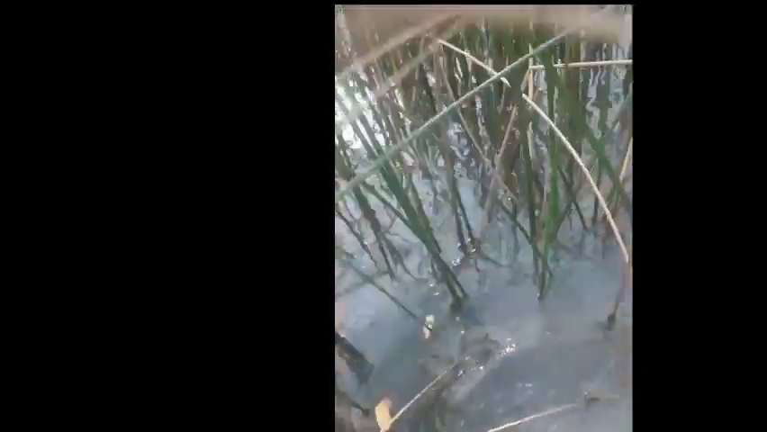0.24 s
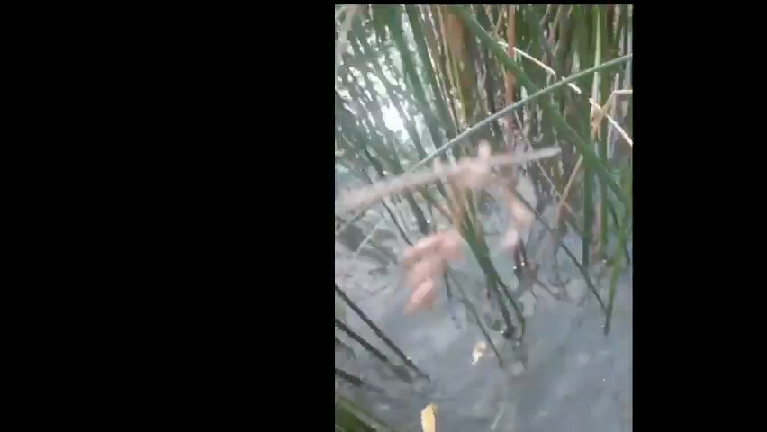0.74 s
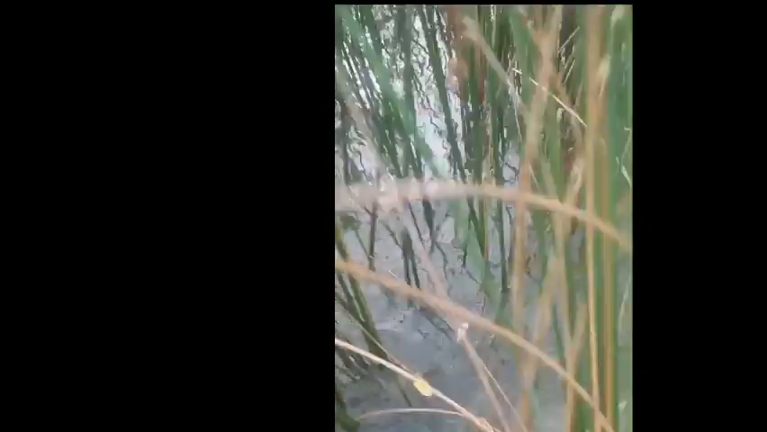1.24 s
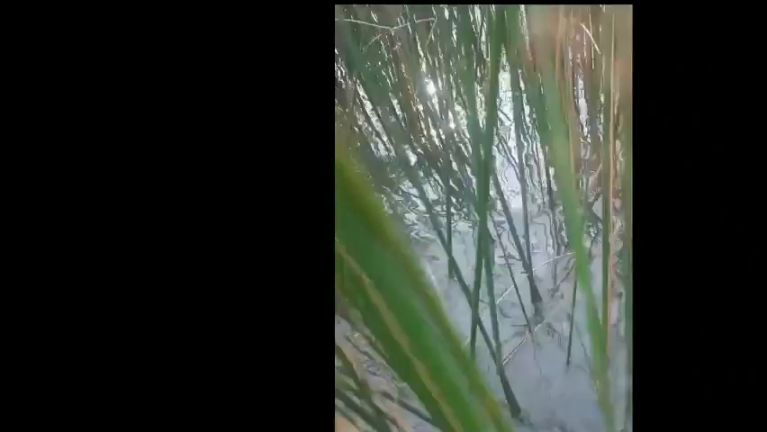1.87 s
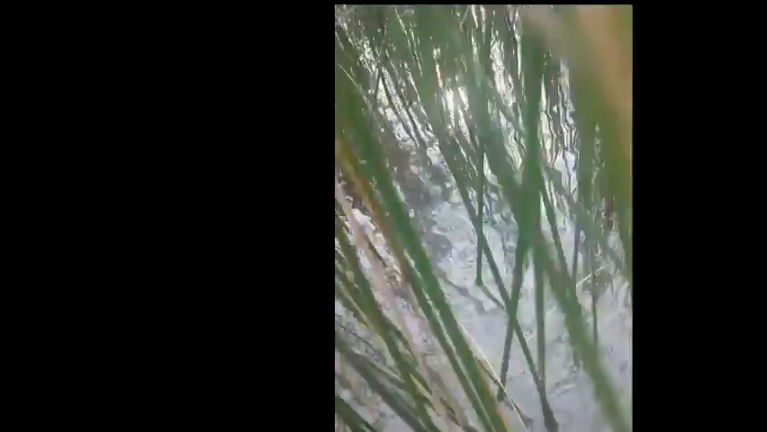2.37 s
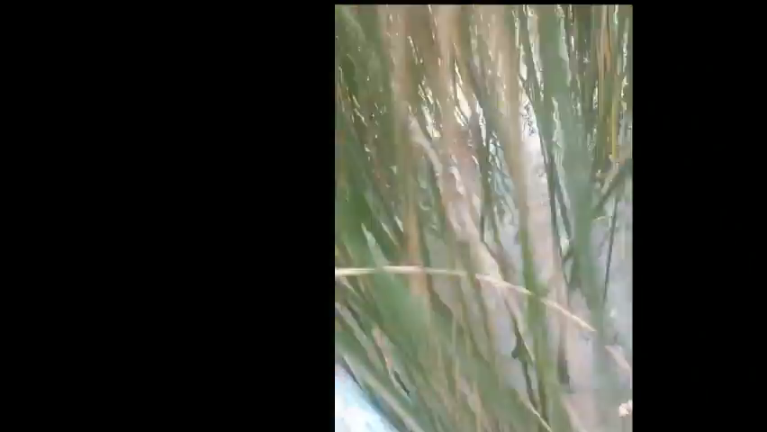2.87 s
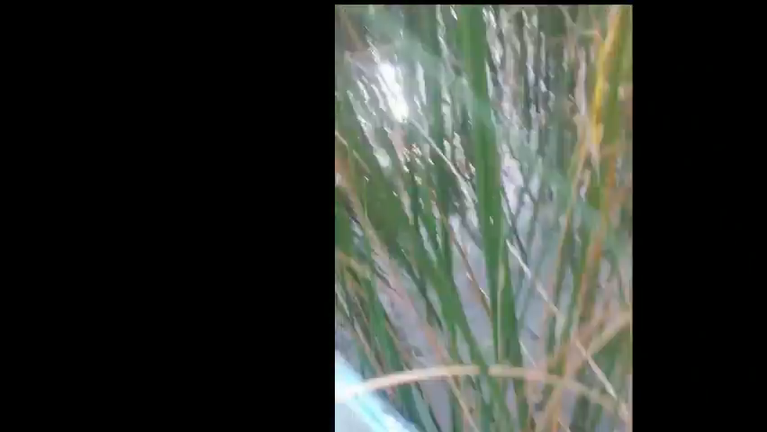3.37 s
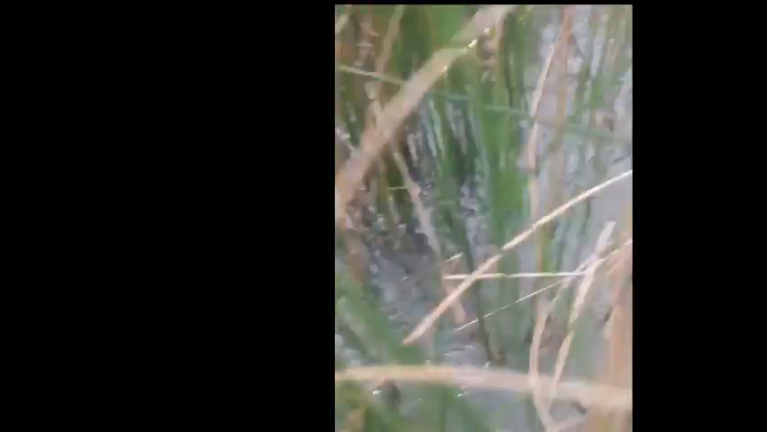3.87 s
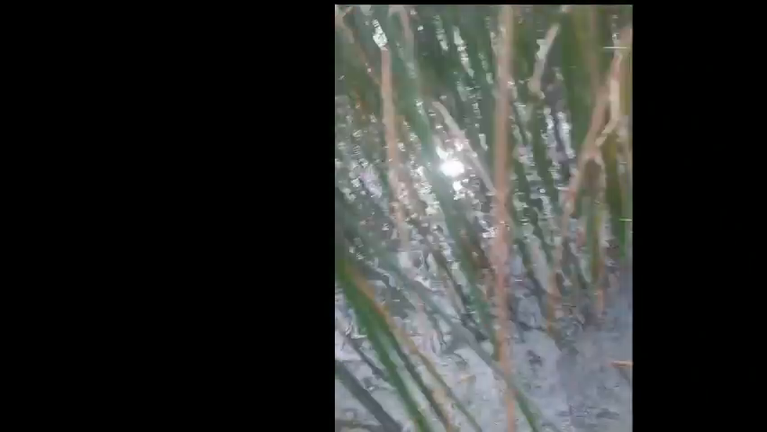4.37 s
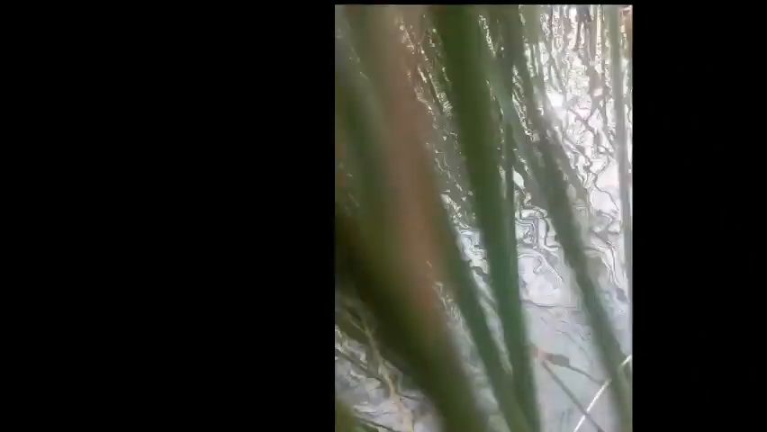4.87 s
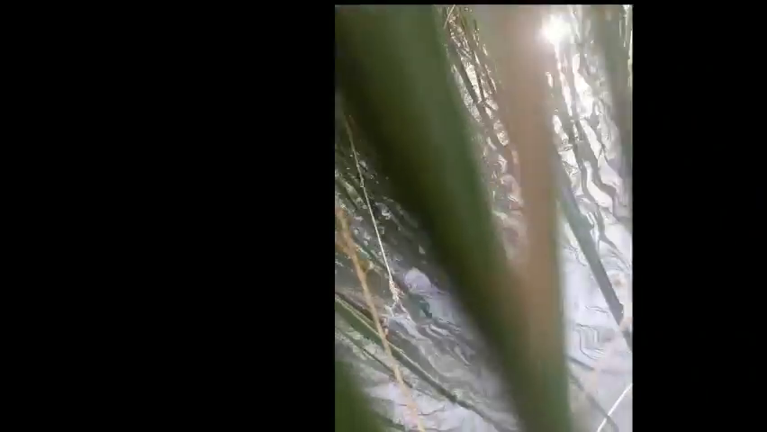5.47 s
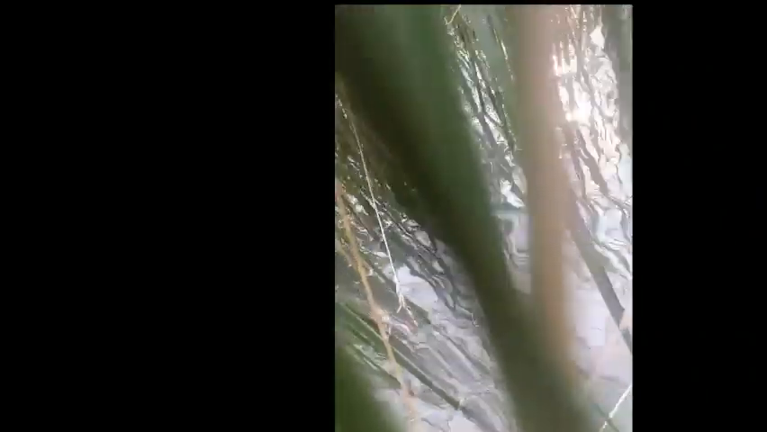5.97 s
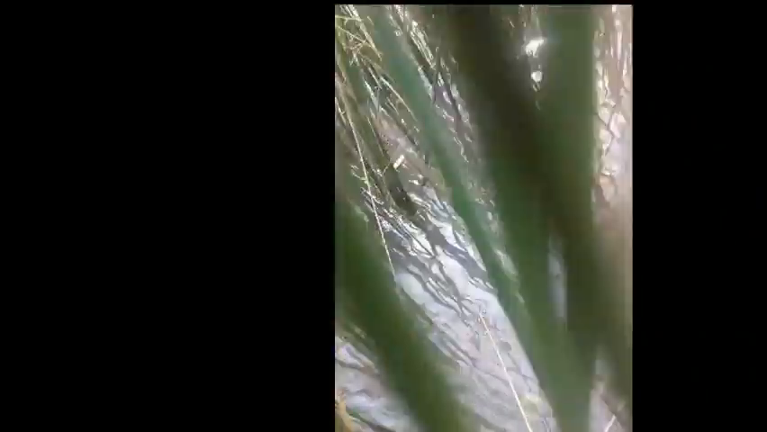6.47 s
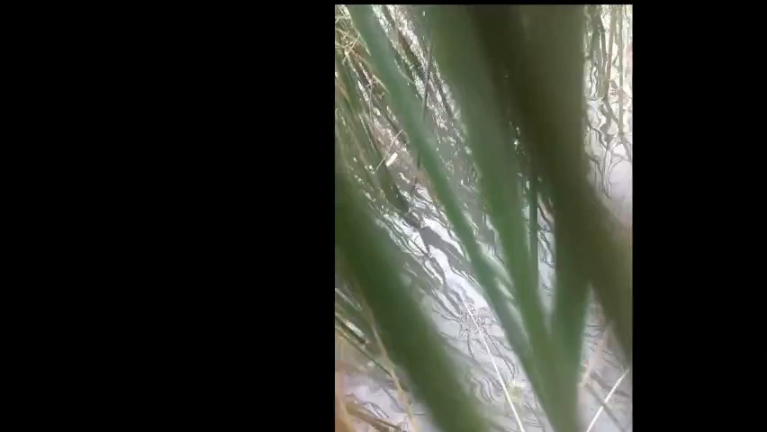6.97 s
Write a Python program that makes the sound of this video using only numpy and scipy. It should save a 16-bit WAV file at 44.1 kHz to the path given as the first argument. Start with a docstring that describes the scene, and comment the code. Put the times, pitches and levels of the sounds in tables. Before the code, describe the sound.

Dry, bright reed leaves rustle and scrape right against a phone microphone as it pushes through a bed in shallow water. Stiff stems snap and flick in two loud flurries during the first half. Then hollow knocks and rubbing of stems on a hull take over, while the rustle thins out. Faint gurgles and drips sit underneath, along with a soft low rumble and hiss.

```python
"""Dense reeds rustle and scrape as someone pushes a phone through them over shallow water.
The leaves are swarms of tiny scratches; stiff stems snap and flick close to the microphone.
Stems rub and knock a hollow hull, ringing its modes, and the water gurgles and drips in short
bubbles. A low rumble and a faint hiss lie under it all."""
import sys
import numpy as np
from scipy import signal
from scipy.fft import rfft, irfft, next_fast_len
from scipy.io import wavfile
from scipy.ndimage import uniform_filter1d

SR = 44100
rng = np.random.default_rng(int(sys.argv[2]) if len(sys.argv) > 2 else 0)


def dump_mix(stems):
    """Bounce the given channels to the path in sys.argv[1] as a 16-bit WAV at rate SR."""
    frames = np.atleast_2d(stems).T  # one column per channel
    limited = np.clip(frames, -1, 1)  # hard clip at full scale
    pcm = np.round(limited * 32767).astype(np.int16)
    wavfile.write(sys.argv[1], SR, pcm)


N = 318843

# Resonances of the hollow hull. Each row: frequency in Hz, relative level in dB,
# base time in seconds to die away by 60 dB (t60).
HULL_MODES = [(227.2, 4.5, 0.21), (280, -5.5, 0.3), (359, 2, 0.078), (443.4, -0.5, 0.077),
              (524, 0.5, 0.052), (570, -36, 0.2), (645, 3.5, 0.053), (728.6, -4, 0.083), (883, 5.5, 0.054),
              (997, 1.5, 0.033), (1113, 3, 0.017), (1310, 16, 0.014), (1532, 5.5, 0.057), (1735, -32, 0.1),
              (1757, 3, 0.09), (2360, 0, 0.031), (2737, 8, 0.058), (3560, -8.5, 0.033)]


def undb(db):
    """Decibels to gain."""
    return 10 ** (np.asarray(db) / 20)


def unit(x):
    """Scale to rms 1."""
    return x / np.sqrt(np.mean(x ** 2))


def at_peak(x, db=0):
    """Scale to a peak level in dB."""
    return x * undb(db) / np.abs(x).max()


def decay(t, t60):
    """Exponential fade, 60 dB down after t60 seconds."""
    return np.exp(-np.log(1000) * t / t60)


def colour(x, points):
    """EQ drawn through (Hz, dB) points; falls away outside them."""
    hz, db = np.transpose(points)
    size = next_fast_len(len(x))
    log_f = np.log(np.maximum(np.arange(size // 2 + 1) * SR / size, 1))
    outside = np.maximum(np.log(hz[0]) - log_f, 0) + np.maximum(log_f - np.log(hz[-1]), 0)
    gain_db = np.interp(log_f, np.log(hz), db) - 20 * outside
    return irfft(rfft(x, size) * undb(gain_db), size)[:len(x)]


def band(x, lo_hz, hi_hz):
    """Causal band-pass."""
    sos = signal.butter(2, [lo_hz, min(hi_hz, .45 * SR)], "band", fs=SR, output="sos")
    return signal.sosfilt(sos, x)


def wander(rate):
    """Random levels held 1 / rate seconds and smoothed twice; rms 1."""
    hold = int(SR / rate)
    steps = np.repeat(rng.standard_normal(N // hold + 1), hold)
    return unit(uniform_filter1d(uniform_filter1d(steps, hold), hold)[:N])


def follow(table):
    """Draw one curve per column through the times in the first column."""
    times, *columns = np.transpose(table)
    return [np.interp(np.arange(N) / SR, times, column) for column in columns]


def add(out, start_s, x):
    """Mix x into out at a time."""
    i = int(start_s * SR)
    out[i:i + len(x)] += x[:len(out) - i]


def friction(rate, spread_db, t60, bed_db):
    """A bed of countless faint contacts, topped by `rate` sudden, uneven scratches a second."""
    starts = (rng.random(N) < rate / SR) * undb(spread_db * np.minimum(rng.exponential(size=N), 3))
    swarm = signal.lfilter([1], [1, -decay(1 / SR, t60)], starts)
    return (undb(bed_db) + unit(swarm)) * rng.standard_normal(N)


def leaf_rustle():
    """Leaves brush past in a swarm of tiny, bright scratches."""
    # Tone of the leaves. Each row: frequency in Hz, gain in dB.
    leaf_eq = [(4500, -1.5), (6000, -1.5), (8000, 1.5), (11000, 2.5), (15000, 9)]
    return unit(colour(friction(rate=110, spread_db=6, t60=0.019, bed_db=3), leaf_eq))


def leaf_ticks():
    """Sparse, very short leaf contacts make dry ticks."""
    # Tone of the ticks. Each row: frequency in Hz, gain in dB.
    tick_eq = [(3500, -9), (6000, -7.5), (10000, -4), (15000, 4.5)]
    return unit(colour(friction(rate=25, spread_db=6, t60=0.0049, bed_db=-30), tick_eq))


def stem_scrape():
    """Stems scrape by with a denser, lower grain than the leaves."""
    # Tone of the scrape. Each row: frequency in Hz, gain in dB.
    scrape_eq = [(1000, -11), (1700, 3.5), (2500, 2), (3500, 6.5), (5000, -7), (7000, -49)]
    return unit(colour(friction(rate=190, spread_db=7.5, t60=0.012, bed_db=4.5), scrape_eq))


def bubbles(count, centre_hz, octaves, cycles=14, glide=0.08, spread_db=3):
    """Air pockets closing in the stirred water: short sines that rise as they fade."""
    out = np.zeros(N)
    for when, pitch, size in zip(rng.random(count), rng.standard_normal(count),
                                 rng.exponential(size=count)):
        hz = centre_hz * 2 ** np.clip(octaves * pitch, -1.5, 2.2)
        turns = np.arange(int(2 * cycles * SR / hz)) * hz / SR
        fade = np.exp(-3 * turns / cycles) * np.minimum(turns / 2, 1)
        chirp = np.sin(2 * np.pi * turns * (1 + glide * turns / cycles / 2))
        add(out, when * N / SR, undb(spread_db * min(size, 2.5)) * fade * chirp)
    return unit(out)


def hull_rub(centre_hz):
    """Stems drag along the hull in slips, exciting mostly the modes near centre_hz."""
    slips = friction(rate=70, spread_db=5.8, t60=0.087, bed_db=-4)
    out = 0
    for hz, db, t60 in HULL_MODES:
        pole = decay(1 / SR, 0.59 * t60)
        mode = signal.lfilter([1, 0, -1], [1, -2 * pole * np.cos(2 * np.pi * hz / SR), pole ** 2], slips)
        nearness = (1 + (np.log(hz / centre_hz) / 0.46) ** 2) ** -1.65
        out = out + unit(mode) * undb(db + 2.4 * wander(13)) * nearness
    return unit(out)


def air():
    """A steady bed of low noise and thin hiss, with a far rumble that wavers."""
    # Tone of the bed. Each row: frequency in Hz, gain in dB.
    air_eq = [(15, -42), (30, -20), (96, 6), (246, -8.5), (523, -15), (1400, -19), (2300, -85),
              (5000, -91.5), (7500, -28), (10600, -58), (15500, -26.5)]
    bed = unit(colour(rng.standard_normal(N), air_eq))
    waver = undb(1.3 * wander(13) + 1.3 * wander(0.4))
    rumble = waver * unit(band(rng.standard_normal(N), 65, 127.5))
    return undb(-50) * bed + undb(-61.5) * rumble


def stem_flicks(snap_db=2, snap_s=0.0012):
    """A stem lets go: a snapping, chattering crack, a duller body and a push of air on the diaphragm."""
    # Close flicks. Each row: start in seconds, crack peak in dB, body peak in dB before a 5 dB lift.
    flicks = [(0.3566, -24, -46), (0.533, -23, -46.5), (0.669, -25, -39.5), (0.683, -20, -42),
              (0.762, -19, -42), (0.841, -4, -21.5), (1.003, -21, -47), (1.0821, -5.5, -23),
              (1.1722, -7.5, -17.5), (1.2518, -13, -26), (1.2967, -14, -34), (1.3099, -1.5, -13.5),
              (1.3348, -8, -27), (1.4488, -6, -19.5), (1.47, -4.5, -29), (2.391, -16, -26.5),
              (2.5265, -25, -35.5), (2.6893, -10, -21.5), (2.7124, -17.5, -26), (2.8639, -8, -10.5),
              (2.8697, -0.5, -7), (2.886, -9, -9), (2.9076, -11, -18), (2.9122, -10, -20.5),
              (2.931, -15, -16), (2.9503, -1.5, -17), (2.9568, -7, -10.5), (2.9826, -12, -9),
              (2.9939, -3, -12.5), (3.0658, -12.5, -20.5), (3.2881, -14.5, -29.5), (3.4412, -27.5, -37),
              (3.531, -21.5, -36), (3.5485, -25, -36), (3.5963, -20, -27.5), (3.662, -25, -22),
              (3.678, -21.5, -45), (3.8276, -26, -30), (4.0691, -44, -25.5), (4.0907, -49, -26.5),
              (4.176, -28, -12), (4.1902, -22, -19.5), (4.4009, -13.5, -23.5), (4.504, -46, -34),
              (5.029, -51, -39), (5.055, -49, -36), (5.139, -39, -32.5), (5.3924, -26.5, -39),
              (5.6863, -34, -47), (6.232, -40, -44.5), (6.306, -54, -53), (7.1629, -31.5, -43)]
    out, t = np.zeros(N), np.arange(2500) / SR
    snap = 1 + undb(snap_db) * np.exp(-t / snap_s)
    fade = decay(t, t60=0.033)
    air_push = t * np.exp(-t / 0.00083) - 0.037 * t * np.exp(-t / 0.0031)  # diaphragm swings out and back
    for start_s, crack_db, body_db in flicks:
        crack_noise, body_noise, thump_noise, jitter = rng.standard_normal((4, len(t)))
        flutter = uniform_filter1d(jitter, size=49) * np.sqrt(49)
        chatter = snap * undb(8 * np.minimum(t / 0.011, 1) * flutter)
        crack = band(np.diff(crack_noise, prepend=0) * fade * chatter, 4300, 20800)
        body = band(body_noise * fade ** 1.12 * chatter, 535, 4130)
        thump = band(thump_noise * fade ** 2.55, 28, 830)
        thump_db = min(crack_db, body_db) + 2.5  # only near flicks, both bright and full, push much air
        push = np.sign(thump_noise[0]) * air_push
        for part, db in ((crack, crack_db), (body, body_db + 5), (thump, thump_db), (push, thump_db - 9)):
            add(out, start_s, at_peak(part, db))
    return out


def leaf_wipes(attack_s=0.0071, release_s=0.03):
    """Extra rustle gain as leaves wipe right across the phone: quick rise, hold, exponential release."""
    # Each row: start in seconds, hold in seconds, relative level in dB.
    wipes = [(1.084, 0.28, -27), (2.842, 0.17, -24.5)]
    gain, t = np.zeros(N), np.arange(N) / SR
    for start_s, hold_s, db in wipes:
        attack = np.clip((t - start_s) / attack_s, 0, 1)
        release = np.exp(-np.maximum(t - start_s - hold_s, 0) / release_s)
        gain += undb(db) * attack * release
    return gain


def hull_knocks(reach=0.22, skirt_reach=0.67, skirt_db=-20.5, scatter_db=4, rattle_db=-11.5):
    """Each blow slaps the hull and rings a new mix of modes near its centre; loose stems rattle after."""
    # Blows on the hull. Each row: start in seconds, peak in dB before the slap is added,
    # centre pitch in Hz, ring length as a multiple of the modes' t60.
    blows = [(1.353, -19, 1240, 0.95), (1.373, -24.5, 400, 0.5), (1.703, -30.5, 970, 0.98),
             (1.805, -26, 296, 0.75), (1.896, -24, 1920, 0.16), (2.509, -27.5, 785, 1.4),
             (2.994, -17, 810, 2), (3.126, -25, 312, 0.79), (3.2, -23, 380, 0.65),
             (3.302, -27.5, 850, 0.52), (3.652, -25.5, 1340, 0.41), (3.662, -18.5, 1010, 0.43),
             (3.692, -27.5, 399, 2), (3.749, -25.5, 1600, 0.45), (3.889, -30.5, 397, 2.2),
             (3.963, -32, 1800, 0.21), (4.068, -27, 600, 1.8), (4.13, -22.5, 780, 0.34),
             (4.173, -7.5, 503, 1.7), (4.178, -5, 1200, 0.72), (4.192, -4.5, 520, 0.91),
             (4.424, -19.5, 1520, 0.46), (4.438, -18.5, 508, 0.95), (4.546, -21.5, 524, 0.62),
             (5.176, -28, 500, 1.5), (5.401, -29, 625, 1.2), (5.451, -21, 530, 0.66),
             (5.473, -10, 1380, 0.3), (5.965, -48.5, 3270, 1.5), (6.145, -9, 674, 0.62),
             (6.194, -33, 1520, 0.48), (6.205, -15, 536, 1.03), (6.307, -28, 1040, 0.2),
             (6.418, -33, 730, 0.97), (6.492, -35, 697, 1.1), (6.676, -41.5, 1230, 0.34),
             (6.858, -29, 890, 0.9), (6.874, -5, 640, 1.13), (6.879, -17.5, 244, 1.53),
             (6.905, -18, 498, 2.7), (7.151, -32, 680, 1.3)]
    out, t = np.zeros(N), np.arange(9000) / SR
    hz, db, t60 = np.transpose(HULL_MODES)
    variations = rng.standard_normal((len(blows), 3, len(hz)))
    for (start_s, peak_db, centre_hz, length), (scatter, detune, phase) in zip(blows, variations):
        noise = rng.standard_normal(len(t))
        distance = np.log(hz / centre_hz)
        near = np.exp(-.5 * (distance / reach) ** 2)
        skirt = undb(skirt_db) * np.exp(-.5 * (distance / skirt_reach) ** 2)  # far modes stir faintly
        gains = undb(db + scatter_db * scatter) * (near + skirt)
        angles = 2 * np.pi * np.outer(hz * (1 + 0.034 * detune), t) + 1.05 * phase[:, None]
        ring = gains @ (np.sin(angles) * decay(t, length * t60[:, None]))
        rattle = band(noise, 0.742 * centre_hz, 1.014 * centre_hz)
        rattle = unit(band(rattle, 58, 3.2 * centre_hz)) * decay(t, 0.11 * length)
        rise = (1 - np.exp(-t * centre_hz * 4)) ** 2  # a softer, lower blow takes longer to land
        blow = rise * (at_peak(ring) + undb(rattle_db) * rattle)
        contact = noise[::-1] * np.minimum(t / 0.00071, 1) * decay(t, t60=0.023)
        slap = band(band(contact, 990, 3030), 990, 3030)
        slap_db = min(13 - 24.5 * length + 0.94 * peak_db, -7)  # hard, dry blows slap most
        add(out, start_s, undb(peak_db) * (at_peak(blow) + at_peak(slap, slap_db)))
    return out


def scene():
    """The push through the reeds rides the textures; flicks, knocks and air join them in mono."""
    # Faders for the reeds. Each row: time in seconds, leaf fader in dB, stem and drip fader in dB.
    push = [(0, -45, -55), (0.5, -40.5, -52), (0.63, -50, -60), (0.67, -39, -49.5), (1.47, -33, -42),
            (1.52, -42, -51), (1.66, -34.5, -46), (2.25, -46.5, -53.5), (2.34, -36.5, -46),
            (2.84, -36.5, -45.5), (3.11, -31.5, -39), (3.3, -34.5, -43.5), (3.5, -46, -55),
            (3.68, -43, -45.5), (4.3, -50.5, -73), (4.68, -41, -42.5), (5.04, -49, -54.5),
            (5.14, -37.5, -43), (5.44, -49.5, -60), (6.05, -60.5, -75.5), (6.35, -58, -72),
            (6.68, -68.5, -95), (6.85, -55.5, -70), (7.23, -44, -53.5)]
    # Moving through the water. Each row: time in seconds, gurgle and rub fader in dB, rub pitch in Hz.
    wade = [(0, -55.5, 710), (1, -54.5, 754), (1.37, -37.5, 735), (1.58, -56.5, 644), (1.86, -45, 670),
            (2.15, -54, 736), (2.35, -46, 810), (2.8, -43.5, 647), (2.95, -40, 700), (3.1, -36.5, 450),
            (3.26, -33, 400), (3.42, -46.5, 570), (4.0, -43.5, 463), (4.16, -40, 476), (4.26, -35, 423),
            (4.7, -37.5, 455), (5.05, -50, 594), (5.18, -39.5, 645), (5.55, -57, 560), (6.05, -70, 590),
            (6.3, -53.5, 597), (6.68, -60, 560), (6.82, -52.5, 480), (7.23, -49.5, 590)]
    leaf_db, stem_db = follow(push)
    slosh_db, rub_hz = follow(wade)
    leaves = (undb(leaf_db) + leaf_wipes()) * undb(-4) * leaf_rustle()
    ticks = undb(leaf_db - 15.5) * leaf_ticks()
    stems = undb(stem_db - 4.5) * stem_scrape()
    drips = undb(stem_db - 12) * bubbles(count=200, centre_hz=2190, octaves=0.5)
    rub = undb(slosh_db + 0.7) * hull_rub(rub_hz)
    gurgle = undb(slosh_db - 6.5) * bubbles(count=300, centre_hz=950, octaves=0.65)
    return (leaves + ticks + stems + drips + rub + gurgle + stem_flicks() + hull_knocks() + air())[None]


def record(dry):
    """The microphone port resonates in the treble; the phone rounds the peaks and cuts the top."""
    port_hz, port_width_hz, port_db, top_hz = 8445, 1220, 11, 15550
    b, a = signal.iirpeak(port_hz, port_hz / port_width_hz, fs=SR)
    bright = dry + (undb(port_db) - 1) * signal.lfilter(b, a, dry)
    rounded = 0.95 * np.tanh(bright / 0.97)
    return signal.sosfilt(signal.ellip(12, .2, 90, top_hz, fs=SR, output="sos"), rounded)


dry = scene()
out = record(dry)
dump_mix(out)
```